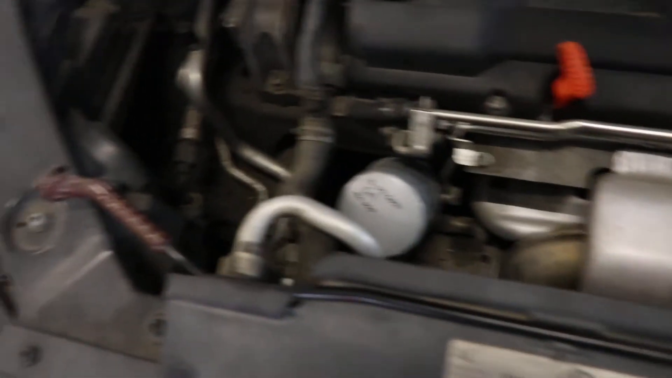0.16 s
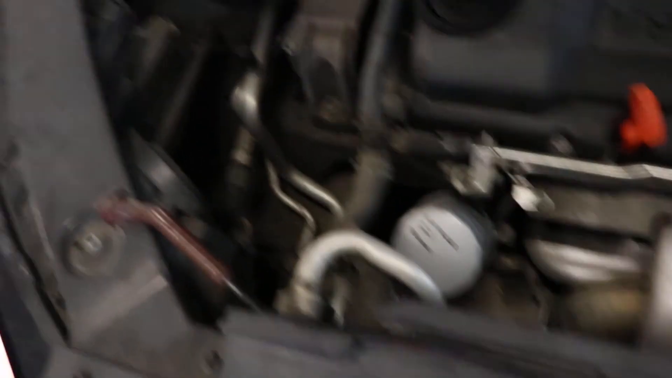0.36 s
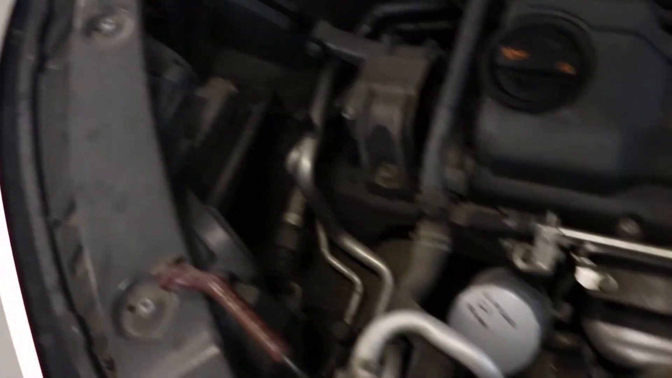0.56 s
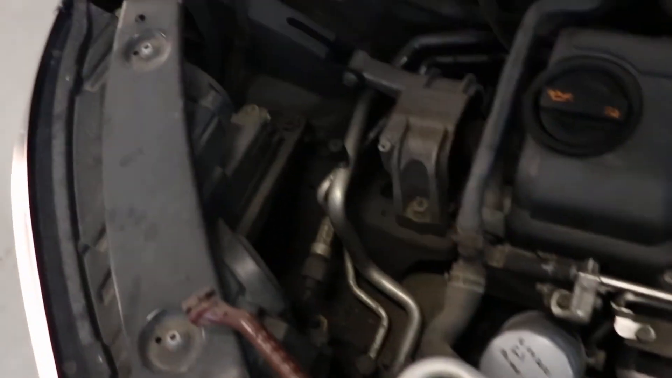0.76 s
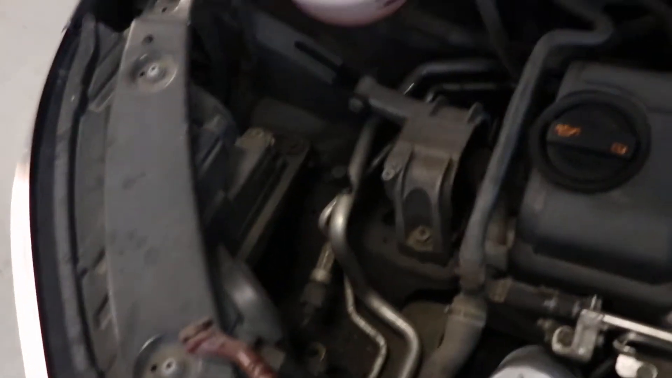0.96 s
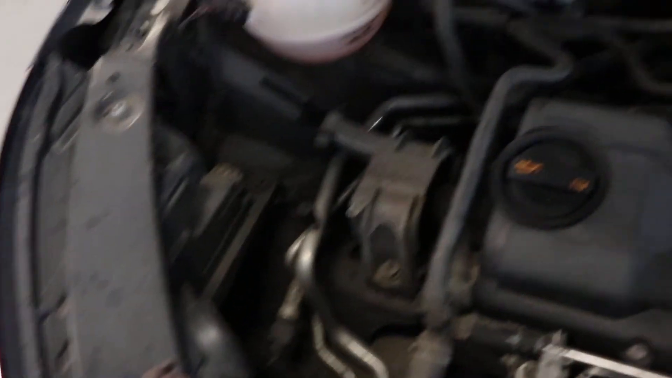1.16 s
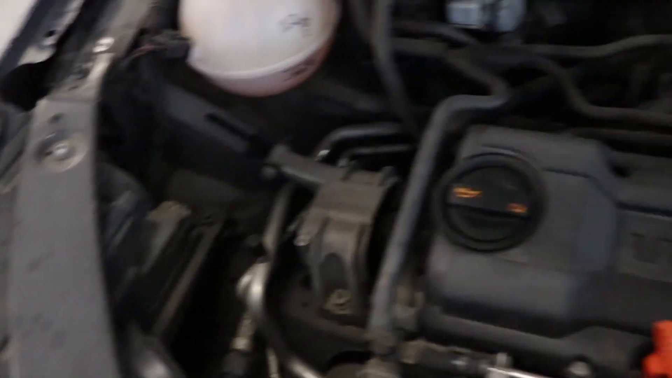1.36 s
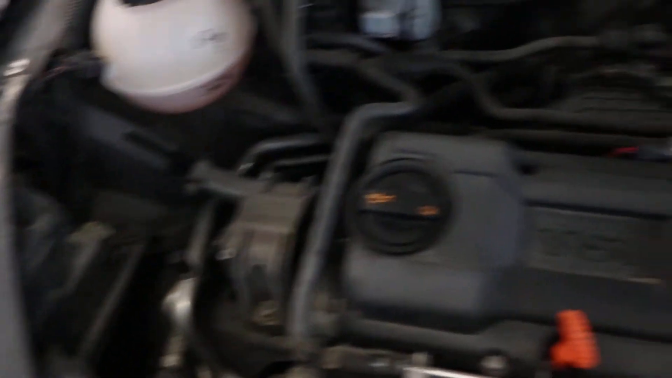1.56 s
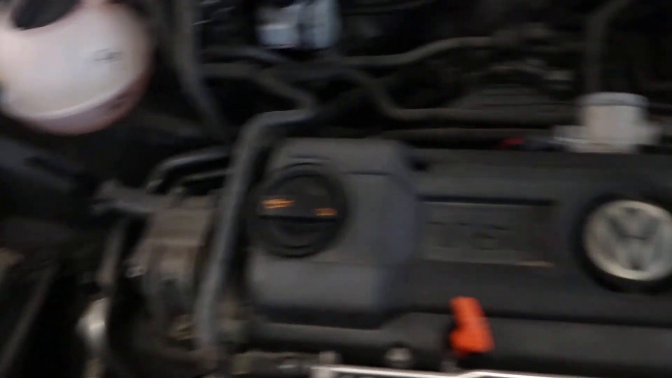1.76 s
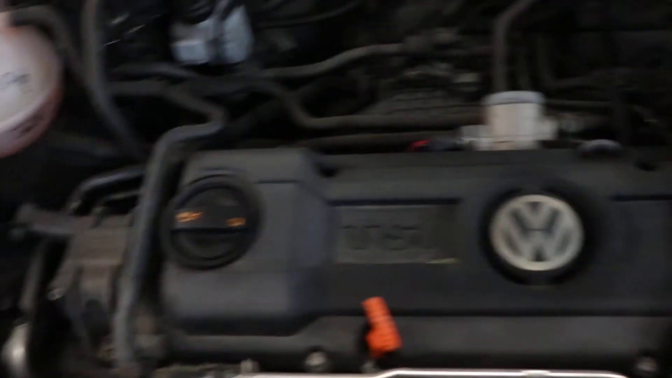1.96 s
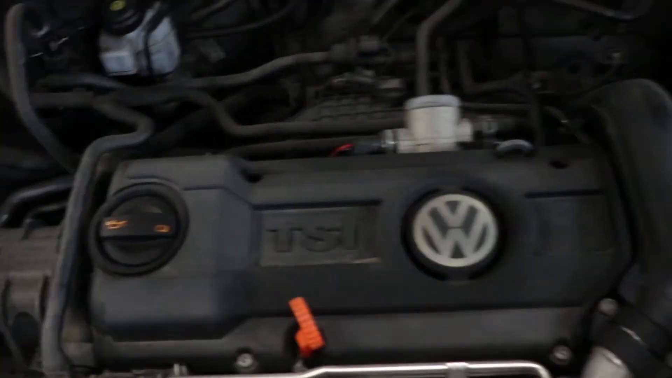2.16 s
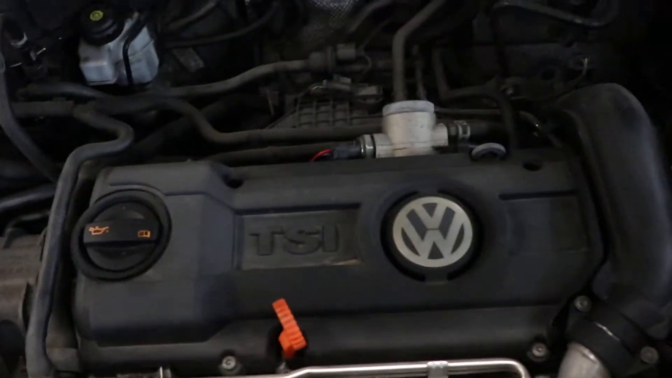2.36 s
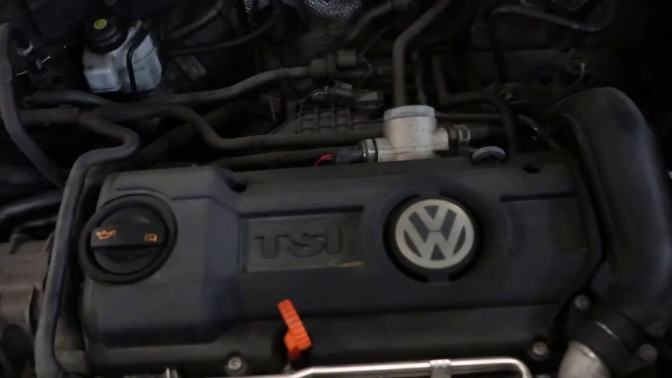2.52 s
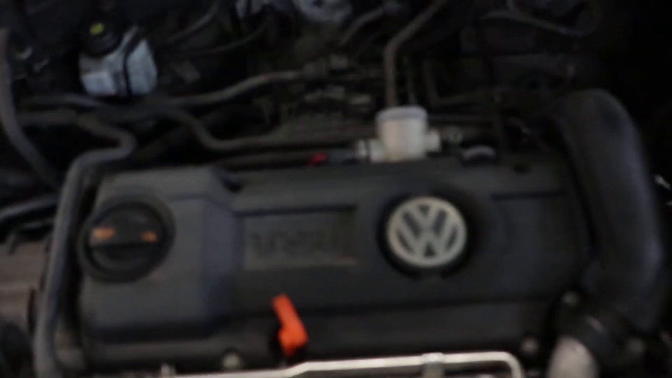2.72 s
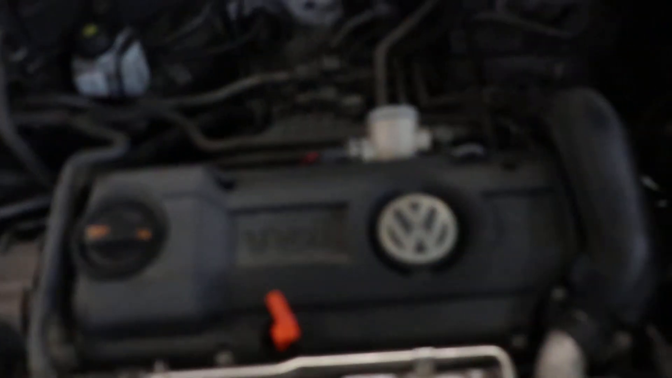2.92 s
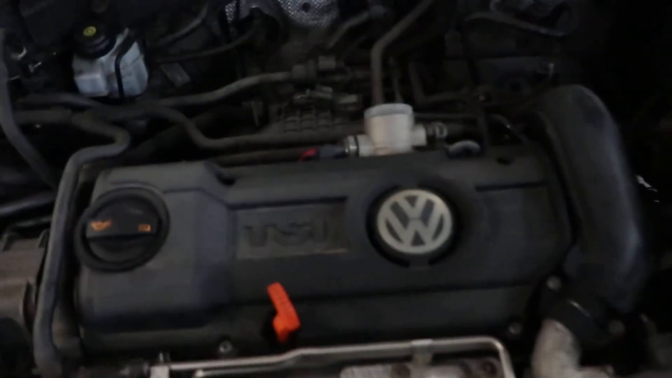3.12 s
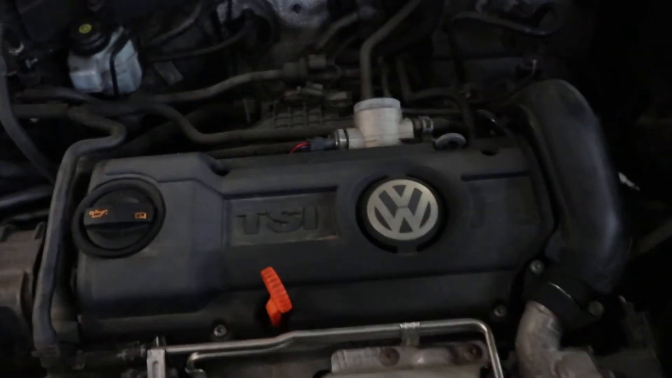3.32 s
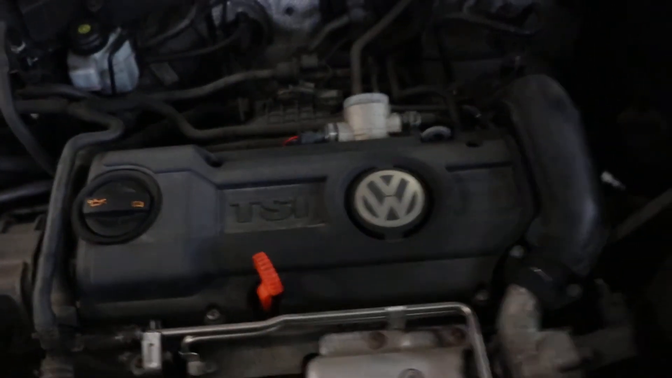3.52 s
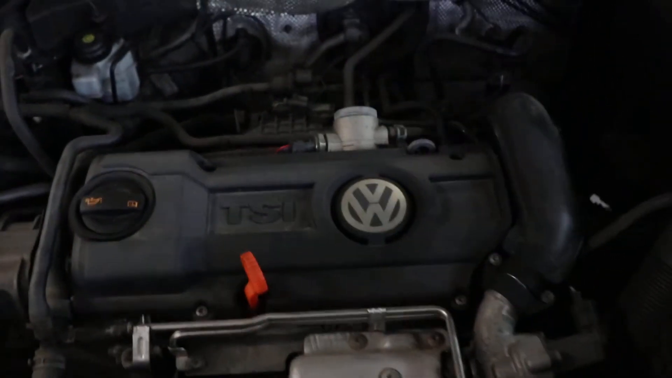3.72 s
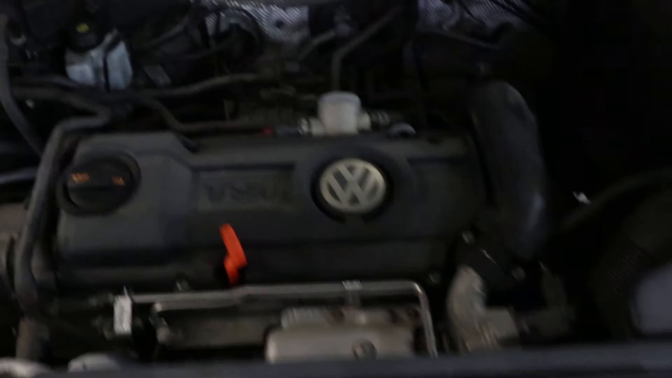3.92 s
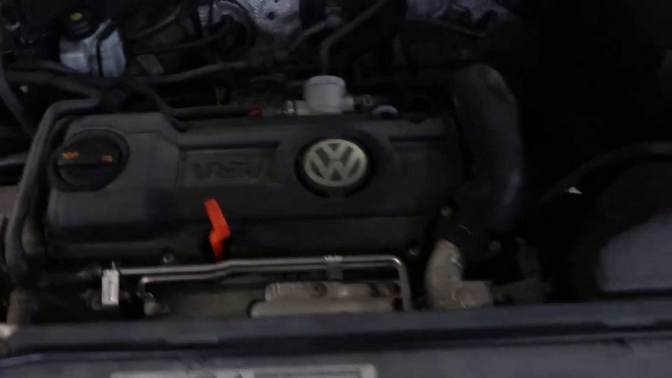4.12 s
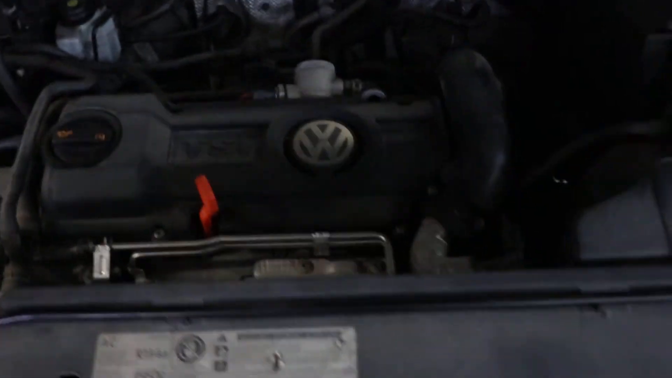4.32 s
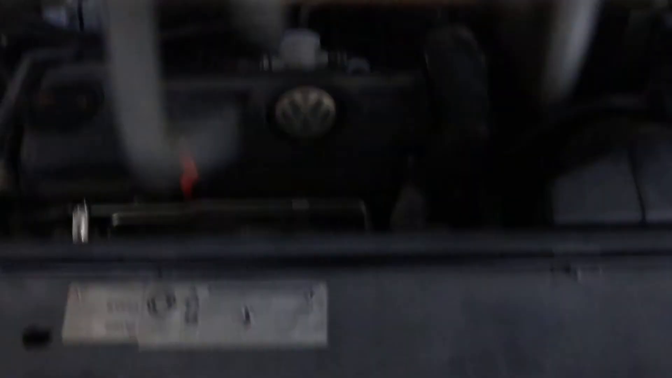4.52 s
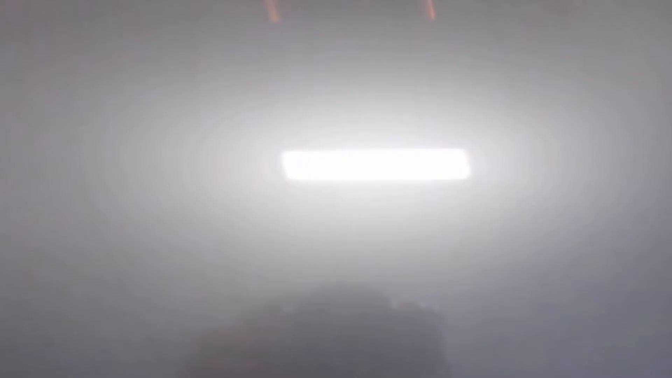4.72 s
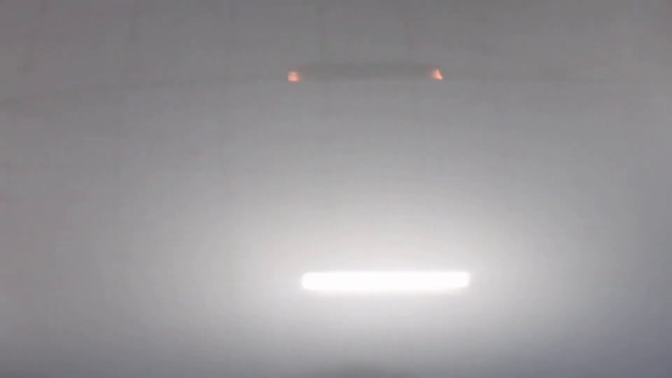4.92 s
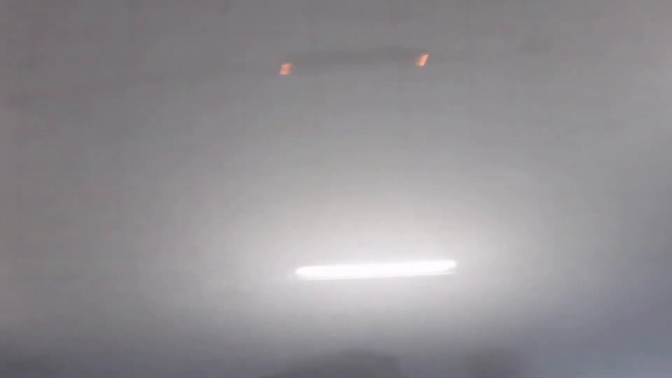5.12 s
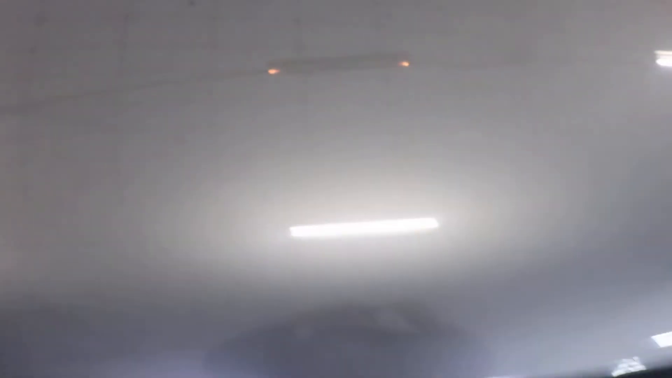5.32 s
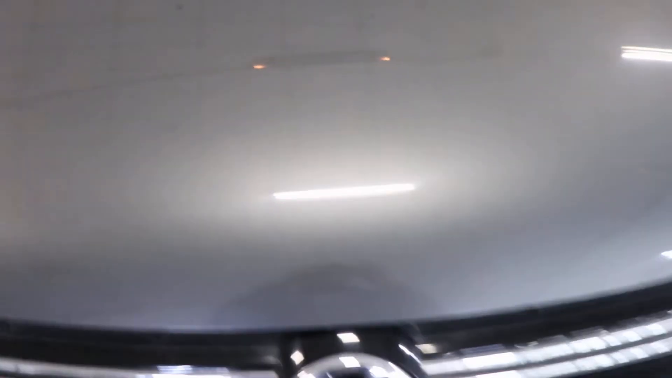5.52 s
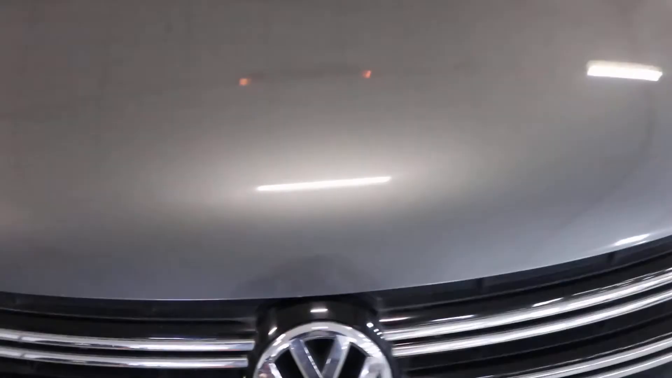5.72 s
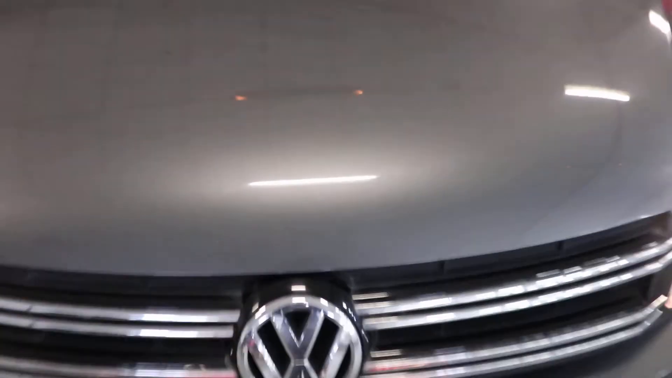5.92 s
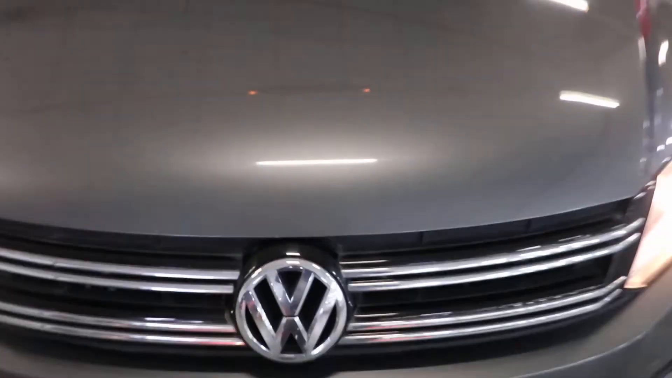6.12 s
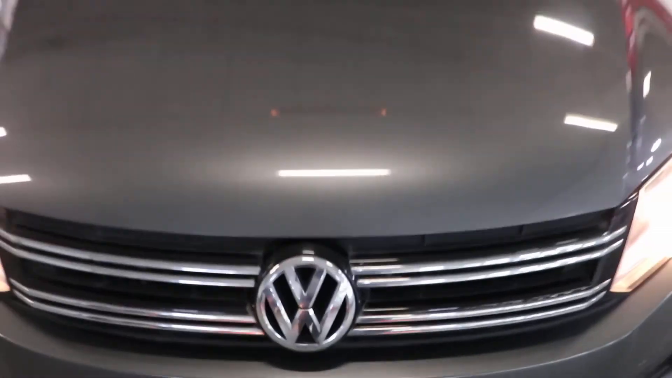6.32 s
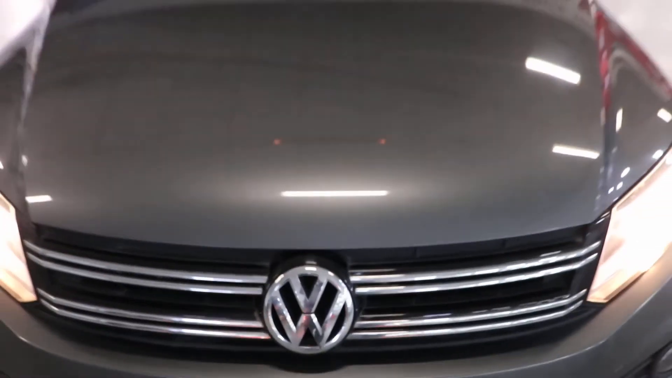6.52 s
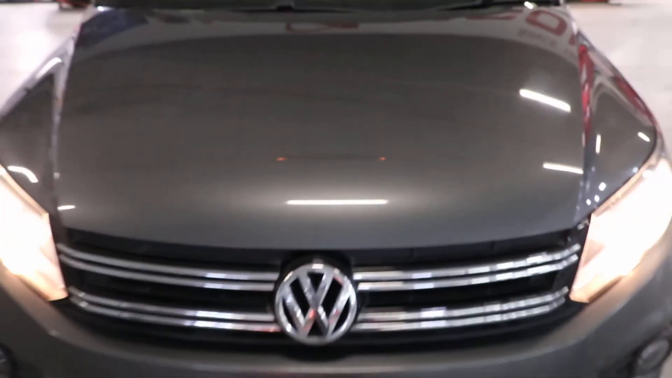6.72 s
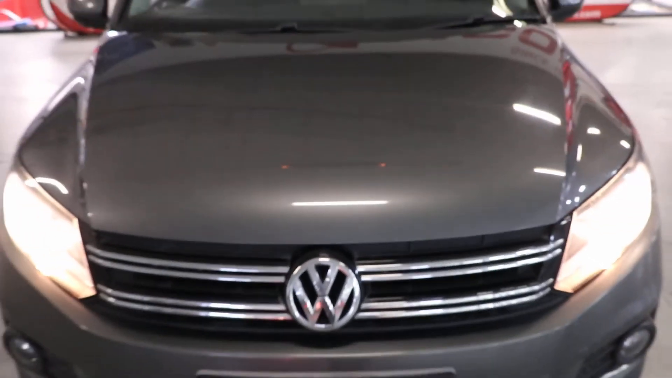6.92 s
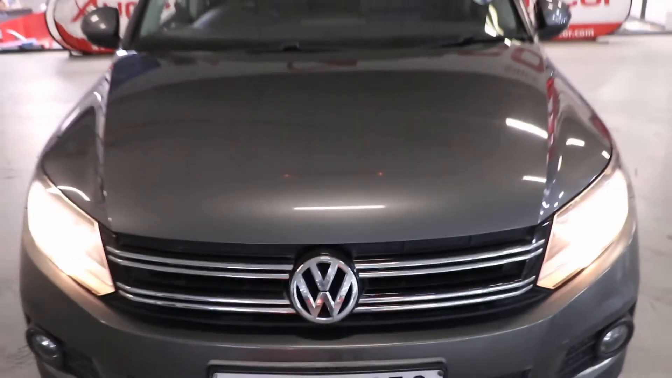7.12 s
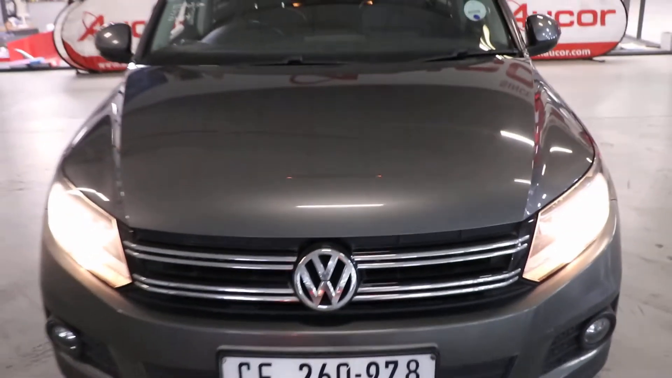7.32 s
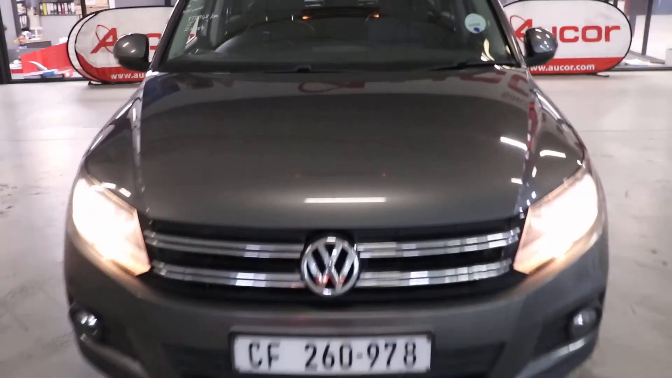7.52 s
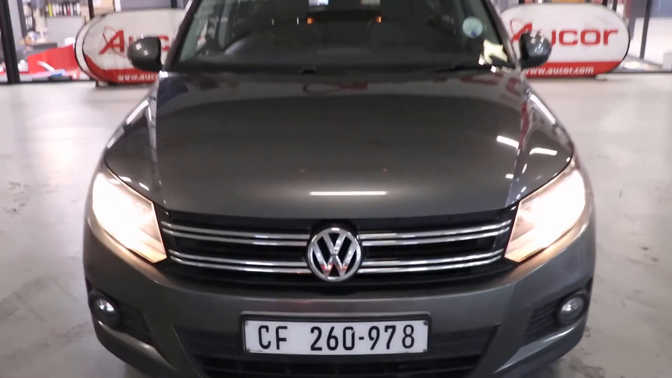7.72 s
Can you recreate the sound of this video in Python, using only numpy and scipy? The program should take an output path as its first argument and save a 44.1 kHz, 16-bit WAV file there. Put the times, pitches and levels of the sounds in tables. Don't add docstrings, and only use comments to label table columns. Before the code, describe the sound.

A handheld stereo microphone moves over an idling petrol engine: steady fan hum, broadband air rush, quick dry ticking and a thin whistle. The bonnet comes down, dulling the sound, and bangs shut with latch clank, panel thud and short rattle. Automatic gain ducks everything; quiet, duller fan noise recovers steadily in a big indoor space until a sharp nearby click dips it slightly again.

```python
import sys
import numpy as np
from scipy import signal
from scipy.fft import rfft, irfft, next_fast_len
from scipy.io import wavfile

SR = 44100
rng = np.random.default_rng(int(sys.argv[2]) if len(sys.argv) > 2 else 0)


def undo_db(level):
    steps = np.asarray(level, float) / 20
    return 10 ** steps


def store_wav(level_fs):
    pcm = np.round(np.clip(np.atleast_2d(level_fs), -1, 1) * 32767)
    wavfile.write(sys.argv[1], SR, pcm.T.astype(np.int16))


N = 347507
T = np.arange(N) / SR

SLOW_HZ, FAST_HZ, PUMP_HZ = 290.5, 335.3, 556.6
BLADES = 7
# (time [s], level [dB])
SLOW_FAN_LEVEL = [(0, -22.5), (.85, -29.5), (2.1, -23.5), (2.7, -24.5), (3.2, -23), (3.55, -24.5),
                  (4.1, -22), (4.97, -20), (4.99, -19), (5.6, -25), (5.85, -19), (6.27, -30.5), (6.42, -23),
                  (6.56, -29.5), (7.0, -24), (7.3, -32), (7.5, -49), (7.8, -42)]
FAST_FAN_LEVEL = [(0, -20.5), (.15, -18.5), (.68, -24), (.9, -21), (1.25, -21), (1.6, -20), (2.15, -19.5),
                  (3.2, -20.5), (3.6, -23.5), (4.1, -20), (4.8, -20.5), (4.97, -20), (4.99, -22),
                  (5.7, -28), (6.28, -33), (6.9, -37), (7.35, -29.5), (7.88, -32.5)]
# (multiple of shaft speed [1], level re blade tone [dB])
SLOW_FAN_ORDERS = [(3, -19), (5, -13), (10, -20.5), (11, -18.5), (12, -25), (14, -19.5)]
FAST_FAN_ORDERS = [(3, -20), (4, -17.5), (5, -22), (9, -29), (10, -16.5), (11, -14), (14, -17), (19, -24),
                   (21, -27), (29, -22.5)]

# (level open [dB], level latched [dB], time at a null [s], reflected share [0-1])
PUMP_HARMONICS = [(-32, -31.5, 6.62, .75), (-43, -41, 6.75, .5), (-45, -43.5, 6.57, .5),
                  (-44, -44.5, 6.6, .3)]
# (multiple [1], time [s], level [dB], half-duration [s])
PUMP_SPOTS = [(1, 4.07, -24, 0.37), (1, 4.85, -5, .1), (1, 5.13, -11, 0.54), (2, 3.42, 9.5, .6),
              (2, 1.4, -11, 0.44), (3, 4.1, 8, .2), (3, 3.45, 7, .15), (4, 3.2, 2.5, .6),
              (2, 7.23, 6.5, 0.38), (3, 5.8, 3.5, 0.23), (3, 12, 4, 0.1), (4, 7.85, 6, 0.067)]
BACK_M_PER_S = 0.313

# (time [s], frequency [Hz])
WHISTLE_PITCH = [(2.4, 5635), (3.6, 5695), (4.55, 5685), (4.95, 5670), (5.25, 5700), (6.25, 5655),
                 (6.3, 5700), (6.85, 5660), (6.92, 5715), (7.2, 5745), (7.35, 5700), (7.88, 5640)]

FIRINGS_PER_S, FIRST_FIRING_S = 33.31, .0245
# (frequency [Hz], level [dB], decay t60 [s])
HEAD_MODES = [(1400, -8, .02), (1790, 0, .03), (1900, -1, .03), (2700, -10, .014), (3600, -7, .016),
              (3850, -8, .016)]
CHUFF_DB, CHUFF_FADES_S = 11, .009

# (frequency [Hz], level [dB])
RUSH_SPECTRUM = [(20, -20), (60, -16), (131, -10), (237, -13), (320, -4), (404, -10), (543, -9.5),
                 (811, -13.5), (1860, -18.5), (3930, -25.5), (5500, -45.5), (7000, -46), (8500, -61)]
# (frequency [Hz], bandwidth [Hz], level [dB], best heard at [s], half-duration [s])
BAY_HOLLOWS = [(1372, 192, 3.5, 3.14, 1.4), (1862, 37, -5.5, 1, 1.1), (1845, 76, -0.5, 3.83, 0.33),
               (3850, 94, 3.5, 2.2, 2.9), (880, 150, -10.5, 1.1, 0.27)]
# (lower edge [Hz], upper edge [Hz], level in both ports [dB], level opposed [dB])
FIZZ_BANDS = [(7920, 8700, 0.5, 2), (8530, 9250, -1, 1), (9950, 11000, -3.5, -1.5),
              (10900, 12300, -8.5, -10), (12500, 13600, -12, -10), (13400, 15200, -14, -11)]
# (frequency [Hz], common share [0-1])
PORT_COHERENCE = [(30, .996), (100, 1), (400, 0.98), (800, 0.96), (1500, 1), (2200, 0.86), (3200, 0.62),
                  (5000, 0.33), (7500, 0.65)]
PORT_LAG = 3.3

# (time [s], latch level [dB], panel level [dB], air push [dB])
SLAM_BLOWS = [
    (4.9777, 7, -4.5, -42),
    (4.9935, -6, -14, -34),
    (5.002, -10, -15, -38),
    (5.0085, -19.5, -15.5, -3),
]
# (frequency [Hz], level [dB], decay t60 [s])
LATCH_MODES = [(1174, 9.5, 0.021), (960, 7.5, 0.011), (1553, -2, 0.061), (3000, 1, 0.016),
               (4600, -17, 0.01), (6600, -24, 0.02), (8500, -36, .008), (2066, -0.5, 0.025)]
PANEL_MODES = [(60.6, -6, 0.47), (123.7, -14, 0.66), (177, -8, 0.7), (241.5, 1, 0.25), (355, -15, 0.19),
               (500, -5, 0.12), (688, 3.5, 0.091)]
# (frequency [Hz], decay t60 [s])
RATTLE_DECAY = [(60, 0.17), (250, 0.47), (700, 0.25), (1400, 0.2), (9000, 0.029)]
CRACKLE_DB, CRACKLE_FADES_S = -12, 0.0079
# (time [s], level [dB], frequency [Hz], decay t60 [s])
NEAR_TICKS = [
    (5.412, -40, 4300, .03),
    (5.553, -31, 4300, .04),
    (5.581, -40, 5200, .02),
    (5.601, -28, 3400, .035),
    (5.790, -33, 4600, .02),
    (7.3478, 3, 4400, .012),
]

# (time [s], gain lost [dB])
GAIN_DUCKS = [
    (4.98, 23),
    (7.349, 4),
]
DUCK_S, WAIT_S, CLIMB_DB_PER_S = 0.0032, 0.39, 8.5
# (time [s], level [dB])
NEARNESS = [(0, 2), (.13, -3.5), (.35, -2), (.75, -4.5), (1.7, -2.5), (2.2, 0), (3.0, -1.5), (4.0, 1),
            (4.5, -4)]

# (open level [dB], change lowered [dB], change latched [dB], boom after slam [dB], share of nearness [1])
RUMBLE, RUSH = (-24.5, -1, -3, 22.5, 0.5), (-20.5, -2.5, -2.5, 11, -0.03)
CLATTER, SIZZLE = (-26, -4.5, -0.26, 0.7, 0.28), (-37.5, -6, 0.5, -1, 0.5)
FIZZ_ALIKE, FIZZ_OPPOSED = (-48.5, -27, 16.5, -16, 0.6), (-43, -11, 0, 0, -0.3)
VALVES, AIR_LEAK = (-21, -12, -4, 0.1, .1), (-59, 9, -4, -1, .1)
BOOM_FADES_S = 0.57
LOWER_S, LOWER_TAKES_S = 4.54, 0.044
LEAK_LEADS_S = .1


def in_time(rows):
    return np.interp(T, *np.transpose(rows))


def at_hz(points, hz):
    table = np.array(points)
    return np.interp(np.log(hz), np.log(table[:, 0]), table[:, 1])


def drift(rate):
    r = np.exp(-80 * np.pi * rate / SR)
    slow = signal.lfilter([1], [1, -2 * r, r * r], rng.standard_normal(N // 40 + 2002))[2000:]
    return np.interp(np.arange(N) / 40, np.arange(len(slow)), slow / slow.std())


def ring(clicks, hz, t60):
    r = undo_db(-60 / (t60 * SR))
    w = 2 * np.pi * hz / SR
    return signal.lfilter([0, np.sin(w)], [1, -2 * r * np.cos(w), r * r], clicks + 1e-18)


def band(x, low_hz, high_hz):
    return signal.sosfilt(signal.butter(2, [low_hz, high_hz], "band", fs=SR, output="sos"), x)


def tone(hz, level_db, wobble_db):
    phase = 2 * np.pi * (np.cumsum(hz) / SR + rng.random())
    return np.sqrt(2) * undo_db(level_db + wobble_db * drift(5.2)) * np.sin(phase)


def ports(x):
    return np.array([np.roll(x, round(PORT_LAG)), x])


def port_noise():
    size = next_fast_len(N)
    hz = np.maximum(np.arange(size // 2 + 1) * SR / size, 1)
    common, left, right = rfft(rng.standard_normal((3, size)))
    alike = np.clip(at_hz(PORT_COHERENCE, hz), 0, .999)
    turn = np.minimum(np.pi * hz * PORT_LAG / SR, np.pi / 2)
    lagged = common * np.exp([-1j * turn, 1j * turn])
    pair = np.sqrt(alike) * lagged + np.sqrt(1 - alike) * np.array([left, right])
    sum_gain = np.sqrt(alike * np.cos(turn) ** 2 + (1 - alike) / 2)
    return irfft(pair / sum_gain, size)[:, :N]


def heard_db(layer, lead_s=0):
    open_db, lowered_db, latched_db, boom_db, share = layer
    since = T - SLAM_BLOWS[0][0]
    boom = boom_db * np.exp(-np.maximum(since - .12, 0) / BOOM_FADES_S)
    shut = (since > 0) * (latched_db + boom)
    lowered = np.clip((T - LOWER_S + lead_s) / LOWER_TAKES_S, 0, 1)
    return open_db + share * in_time(NEARNESS) + lowered_db * lowered + shut


def fan(hz, table, orders):
    level_db = in_time(table)
    hz = hz * (1 + 0.00065 * drift(1.77))
    blade_tone = tone(hz, level_db, 0.64)
    return blade_tone + sum(tone(hz * k / BLADES, level_db + order_db, 2.17) for k, order_db in orders)


def rush(patchy_db, shared_db):
    white = [port_noise(), port_noise()]
    together = drift(14)
    edges = 22 * 2 ** (np.arange(27) / 3)
    groups = np.zeros((4, 2, N))
    for k, (low, high) in enumerate(zip(edges, edges[1:])):
        hz = np.sqrt(low * high)
        flicker = patchy_db * drift(6.3) + shared_db * together * (hz > 700)
        gain = undo_db(at_hz(RUSH_SPECTRUM, hz) + flicker)
        groups[np.searchsorted([250, 1500, 5000], hz)] += gain * band(white[k % 2], low, high)
    for hz, width, gain_db, s, lasts in BAY_HOLLOWS:
        hollow = band(white[1], hz - width / 2, hz + width / 2)
        passing = np.exp(-((T - s) / lasts) ** 2)
        groups[1 + (hz > 1500)] += undo_db(at_hz(RUSH_SPECTRUM, hz) + gain_db) * passing * hollow
    layers = (RUMBLE, RUSH, CLATTER, SIZZLE)
    return sum(undo_db(heard_db(layer)) * g / g.mean(axis=0).std() for layer, g in zip(layers, groups))


def pump():
    hz = PUMP_HZ * (1 + 0.000694 * drift(1.9))
    levels_db = []
    for k, (open_db, latched_db, null_s, share) in enumerate(PUMP_HARMONICS, 1):
        turn = 4 * np.pi * k * PUMP_HZ * BACK_M_PER_S * (T - null_s) / 343
        standing_db = 20 * np.log10(np.abs(1 - share * np.exp(1j * turn)))
        spots_db = sum(db * np.exp(-((T - s) / lasts) ** 2) for m, s, db, lasts in PUMP_SPOTS if round(m) == k)
        levels_db.append(np.where(T < SLAM_BLOWS[0][0], open_db, latched_db + standing_db) + spots_db)
    levels_db += [levels_db[3] - 11, levels_db[3] - 10]
    return sum(tone(hz * k, level_db + 2.0, 0.64) for k, level_db in enumerate(levels_db, 1))


def valves():
    turns = FIRINGS_PER_S * (T - FIRST_FIRING_S) + .025 * drift(9)
    cycle = np.floor(turns)
    beat = np.diff(cycle, prepend=-1) > 0
    strengths = rng.standard_normal((int(turns.max()) + 2, len(HEAD_MODES)))
    uneven = np.clip(strengths, -2, 1.5)[cycle.astype(int)]
    rings = 0
    for k, (hz, db, t60) in enumerate(HEAD_MODES):
        rings = rings + ring(beat * undo_db(db + 2 * uneven[:, k]), hz, t60)
    fading = np.exp(-(turns % 1) / FIRINGS_PER_S / CHUFF_FADES_S)
    chuff = undo_db(CHUFF_DB + 1.1 * drift(6)) * band(fading * rng.standard_normal(N), 1680, 2050)
    return undo_db(heard_db(VALVES)) * (band(rings, 900, 5600) + chuff)


def whistle():
    hz = in_time(WHISTLE_PITCH) + 15 * drift(40)
    dashes_db = 3.2 * np.clip(drift(22), -3, 1)
    return tone(hz, heard_db(AIR_LEAK, LEAK_LEADS_S) + 10 + dashes_db, 1.5)


def hiss():
    centre_db, wide_db = heard_db(FIZZ_ALIKE), heard_db(FIZZ_OPPOSED)
    white = rng.standard_normal((2, 2, N))
    fizz = 0
    for k, (low, high, mid_db, side_db) in enumerate(FIZZ_BANDS):
        brighter_db = k * 0.18 * (np.clip(centre_db, -60, -45) + 54.0)
        levels_db = [mid_db + brighter_db + 2.0 * drift(29), side_db + .8 * drift(10)]
        fizz = fizz + undo_db(levels_db) * band(white[k % 2], low, high)
    fizz = fizz / fizz.std(axis=1, keepdims=True)
    mid, side = fizz * undo_db([centre_db + 1.0 * drift(8.1), wide_db])
    return np.array([mid + side, mid - side])


def slam():
    at = [round(row[0] * SR) for row in SLAM_BLOWS]
    out = np.zeros(N)
    for modes, column in ((LATCH_MODES, 1), (PANEL_MODES, 2)):
        for hz, level_db, t60 in modes:
            clicks = np.zeros(N)
            clicks[at] = undo_db(np.array(SLAM_BLOWS)[:, column] + level_db - 8.5)
            out += ring(clicks, hz, t60)
    for s, *_, push_db in SLAM_BLOWS:
        suction = np.exp(-((T - s - .0011) / .0011) ** 2)
        pressure = np.exp(-((T - s - .0047) / .0026) ** 4)
        rebound = np.exp(-((T - s - .012) / 0.0037) ** 2)
        out += undo_db(push_db) * (0.74 * pressure - 1.4 * suction - 0.28 * rebound)
    out, white = ports(out), port_noise()[:, :SR]
    since = T[:SR]
    for hz in 60 * 2 ** np.arange(0, 7.5, .5):
        swell = 1 - np.exp(-(since * hz / 3.0) ** 2)
        decay_db = 60 * since / at_hz(RATTLE_DECAY, hz)
        gain = undo_db(21.0 - 4.94 * np.log2(hz / 60) - decay_db) * swell
        out[:, at[0]:at[0] + SR] += gain * band(white, hz, hz * 1.21)
    return out


def crackle():
    fading = np.zeros(N)
    for s, latch_db, *_ in SLAM_BLOWS[:3]:
        fading += undo_db(.5 * latch_db) * (T > s) * np.exp(-np.maximum(T - s, 0) / CRACKLE_FADES_S)
    return undo_db(CRACKLE_DB) * ports(band(fading * rng.standard_normal(N), 1700, 4500))


def ticks():
    out = np.zeros(N)
    for s, level_db, hz, t60 in NEAR_TICKS:
        click = undo_db(level_db) * (np.arange(N) == round(s * SR))
        out += .2 * ring(click, hz, t60) + ring(click, .92 * hz, .0025) + .5 * ring(click, .55 * hz, .003)
        out += 0.1 * ring(click, 2.0 * hz, 0.0013) + 0.22 * ring(click, 3.8 * hz, 0.0013)
    rubbing = np.exp(-((T - 5.53) / 0.13) ** 2)
    rustle = undo_db(-61) * rubbing * band(rng.standard_normal(N), 6940, 9400)
    out = signal.sosfilt(signal.butter(2, 1500, "high", fs=SR, output="sos"), out)
    return np.array([out * undo_db(5), -out * undo_db(-4)]) + rustle


def hall():
    hum_hz = np.interp(T, [6.9, 7.88], [481, 469])
    hum_db = np.interp(T, [6.8, 7.1, 7.34, 7.37, 7.88], [-70, -40, -38, -42, -41])
    hum = tone(hum_hz, hum_db, 1.5)
    grip = np.exp(-((T - 7.1) / 0.33) ** 2)
    grip += 0.29 * np.exp(-((T - 6.15) / 0.1) ** 2)
    grip += 0.51 * np.exp(-((T - 7.6) / .2) ** 2)
    rub = undo_db(15.5 + 2.0 * drift(8) - 30.5) * grip * band(rng.standard_normal(N), 20, 110)
    return ports(hum + rub)


def automatic_gain_db():
    lost = sum(db * np.clip((T - s) / DUCK_S, 0, 1) for s, db in GAIN_DUCKS)
    return CLIMB_DB_PER_S * np.maximum(T - GAIN_DUCKS[0][0] - WAIT_S, 0) - lost


def scene():
    fans = fan(SLOW_HZ, SLOW_FAN_LEVEL, SLOW_FAN_ORDERS) + fan(FAST_HZ, FAST_FAN_LEVEL, FAST_FAN_ORDERS)
    engine = fans + pump() + whistle() + valves()
    dull = signal.butter(6, 7700, fs=SR, output="sos")
    bay = signal.sosfilt(dull, rush(patchy_db=0.79, shared_db=.5)) + hiss() + ports(engine)
    pan_db = np.interp(T, [0, 1.2, 2.1], [-.5, -.5, 0])
    bay = bay * undo_db(automatic_gain_db() + [pan_db, -pan_db])
    bonnet = signal.sosfilt(dull, slam() + crackle())
    return bay + bonnet + ticks() + hall()


def band_limit(x):
    return signal.sosfilt(signal.butter(12, 15450, fs=SR, output="sos"), x)


def record(dry):
    top_cut = signal.cheby2(8, 50, 15900, fs=SR, output="sos")
    mix = signal.sosfilt(top_cut, np.clip(dry, -.97, .97))
    return band_limit(mix)


dry = scene()
out = record(dry)
store_wav(out)
```